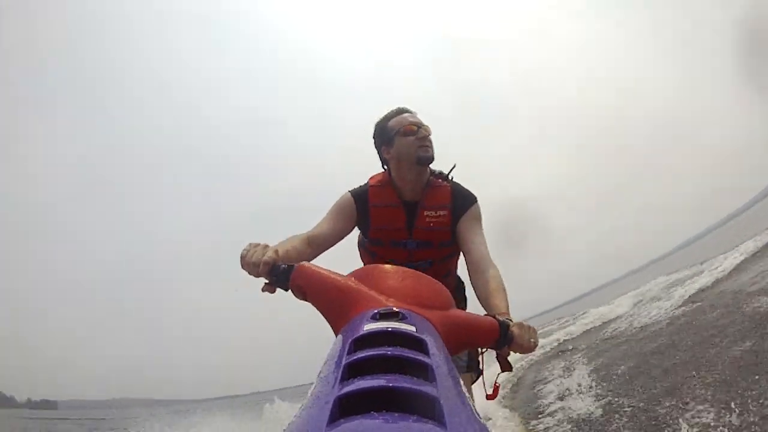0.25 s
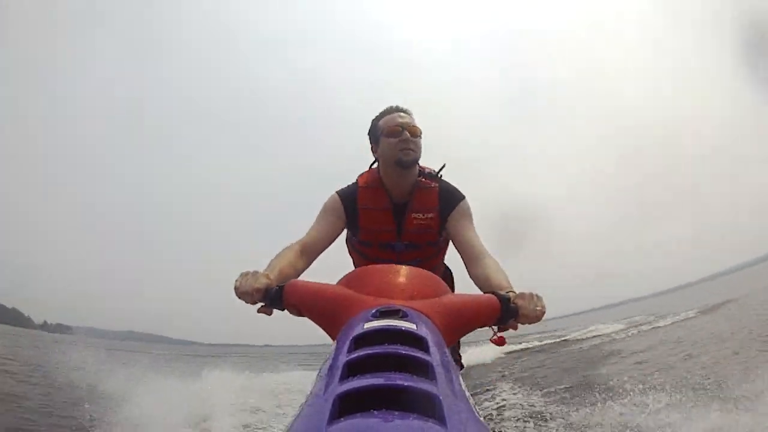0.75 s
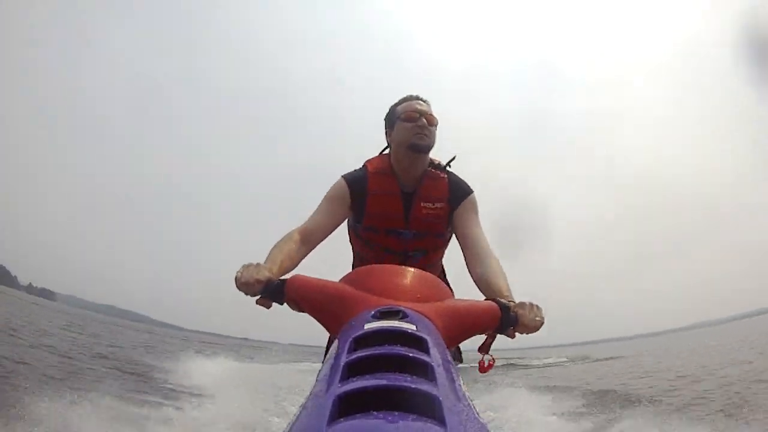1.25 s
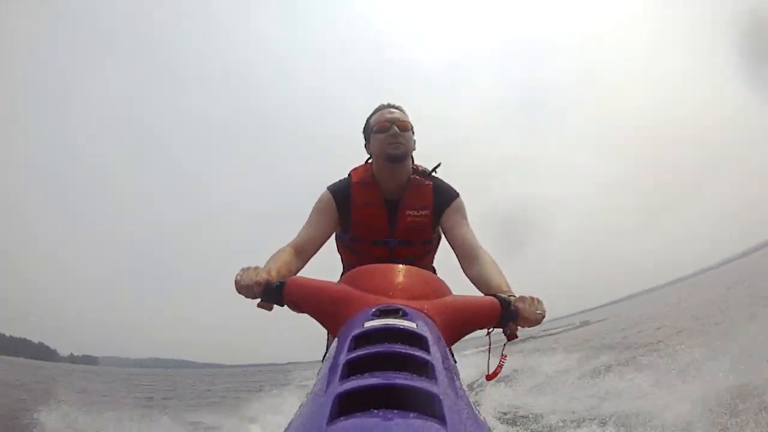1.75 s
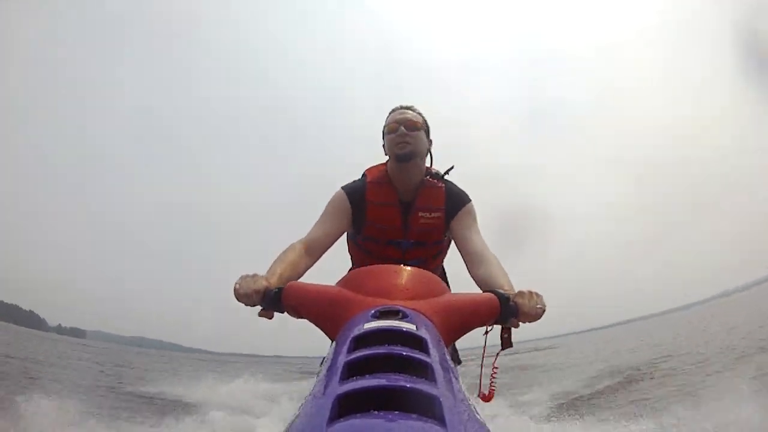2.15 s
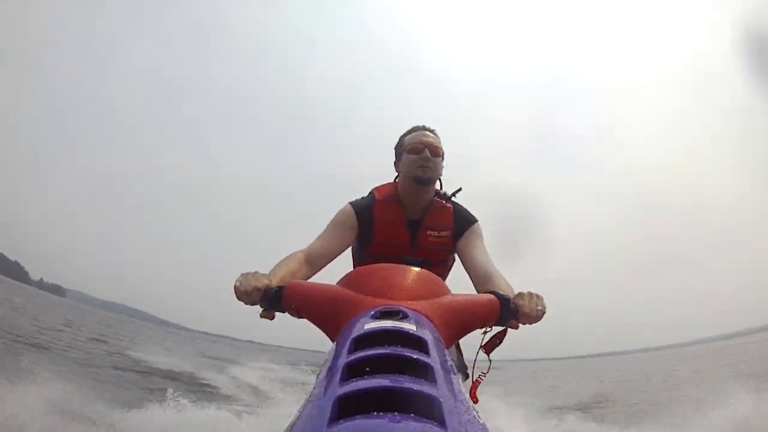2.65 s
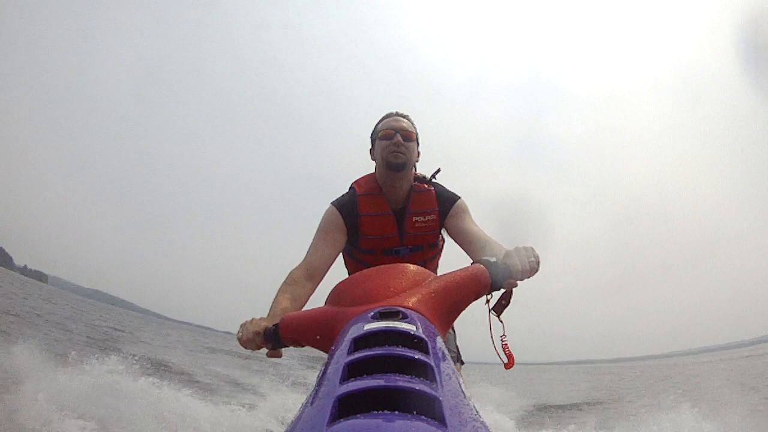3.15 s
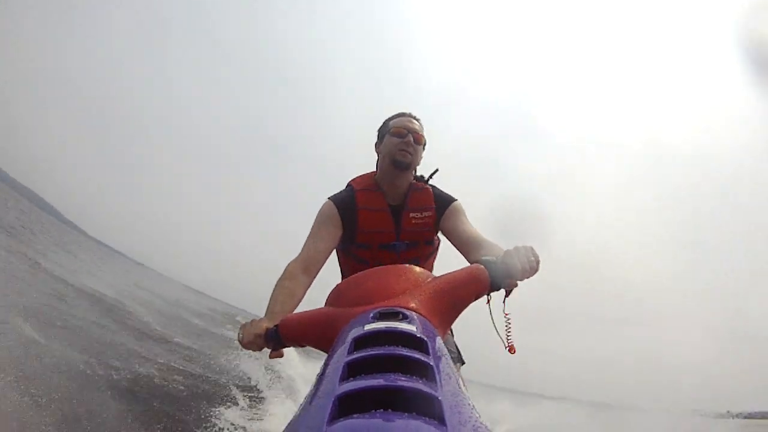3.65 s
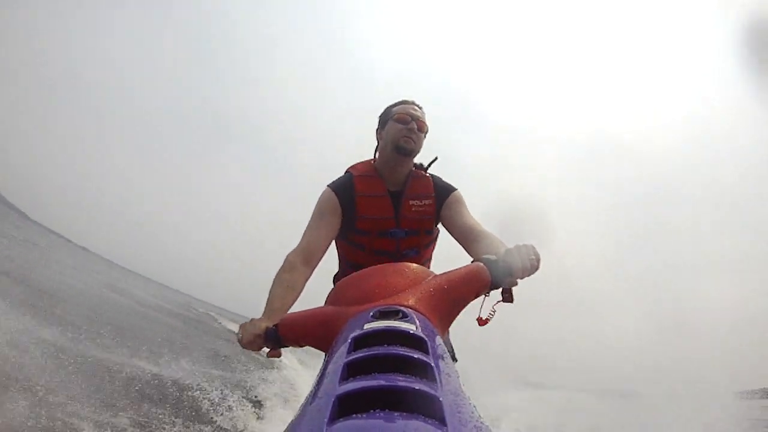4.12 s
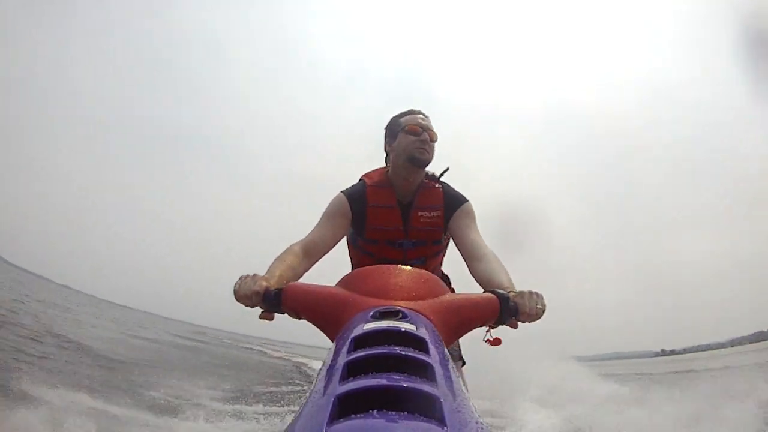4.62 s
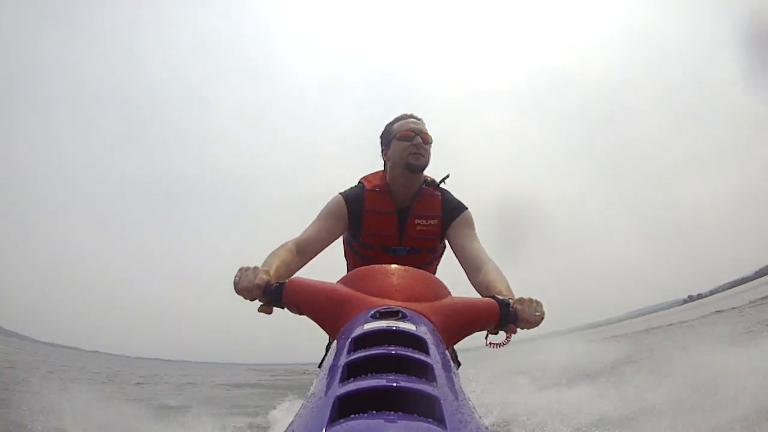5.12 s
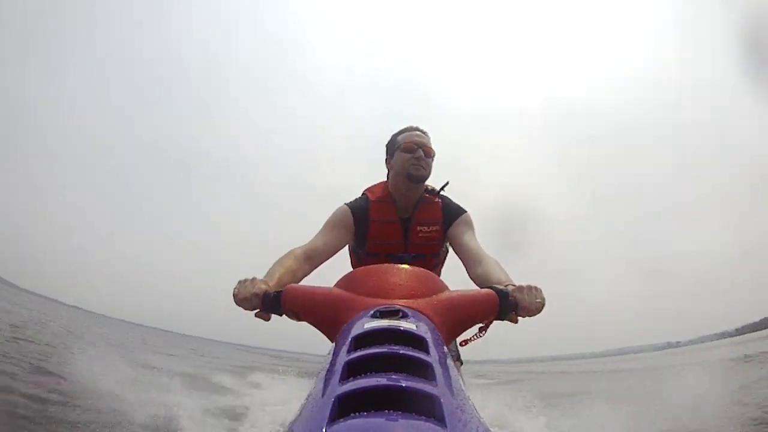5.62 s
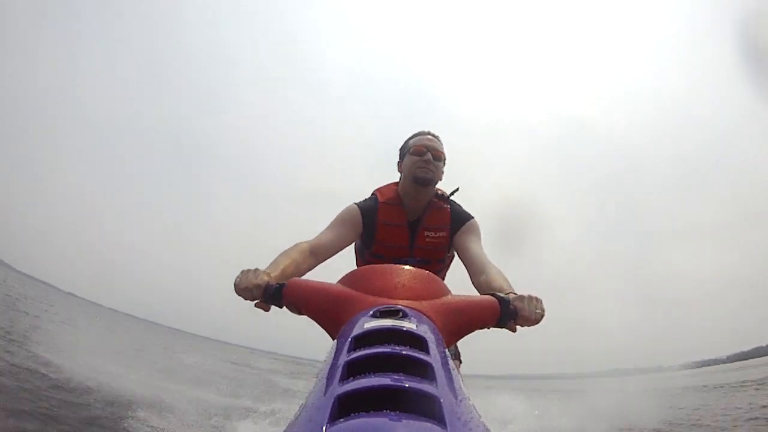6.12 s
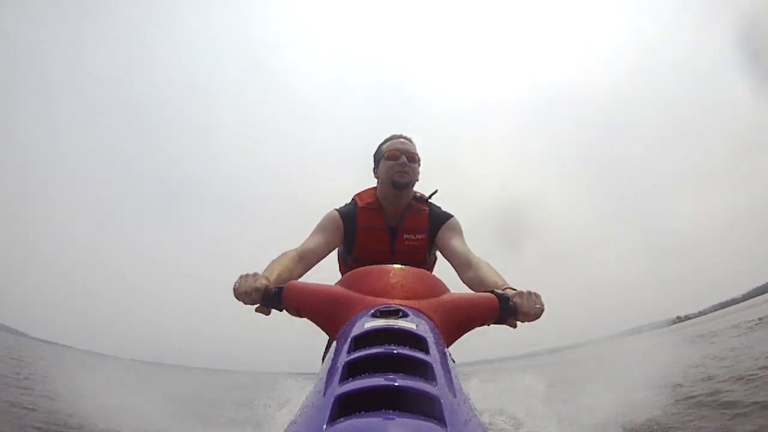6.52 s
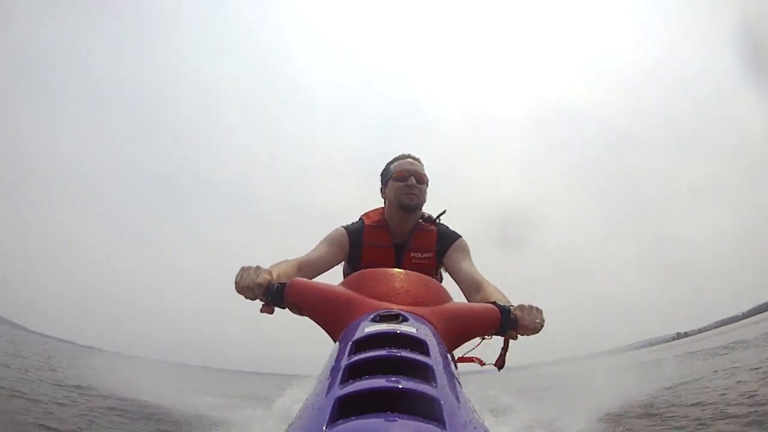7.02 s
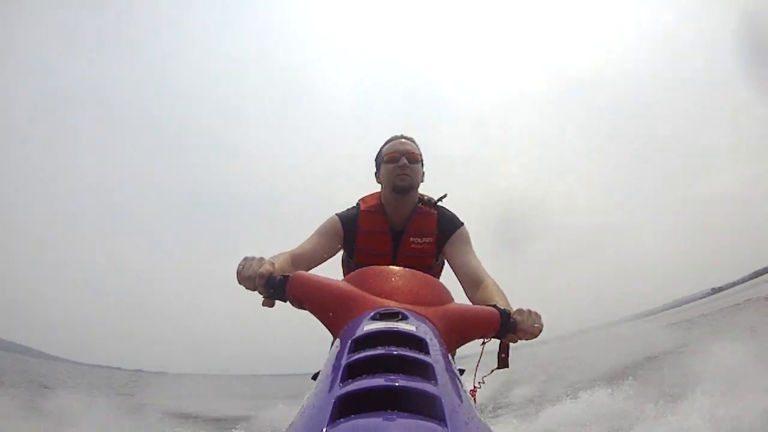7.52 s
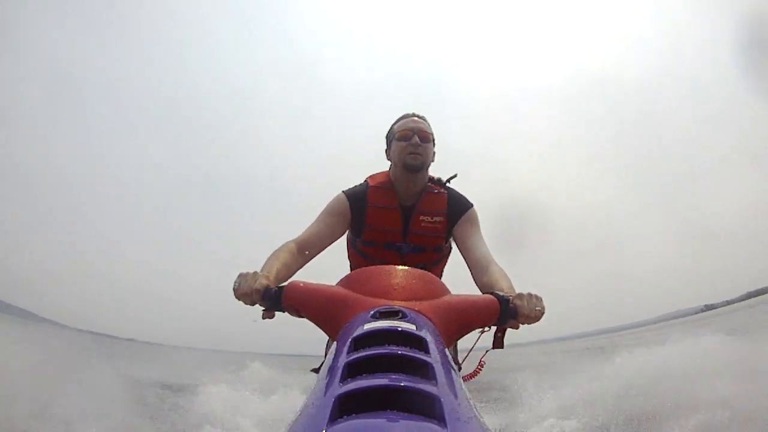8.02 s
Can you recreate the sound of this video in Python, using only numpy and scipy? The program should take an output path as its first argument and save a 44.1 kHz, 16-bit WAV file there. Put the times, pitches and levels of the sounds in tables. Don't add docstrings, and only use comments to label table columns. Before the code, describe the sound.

A two-stroke watercraft runs fast across open water, heard from a sealed microphone fixed to its hull. It opens with a loud raspy exhaust bark and heavy wave thuds, then a hard slap drops it into a duller, wavering hum. Wind roars and rumbles, spray washes and hisses, another sharp slap lands near the middle, and later droplets click on the case as the exhaust barks return.

```python
import sys
import numpy as np
from scipy import signal
from scipy.io import wavfile

SR = 44100
rng = np.random.default_rng(int(sys.argv[2]) if len(sys.argv) > 2 else 0)


def natural_amplitude(level_db):
    exponent = np.asarray(level_db, float) / 20
    return 10 ** exponent


def transcribe(u):
    v = np.clip(np.atleast_2d(u).T, -1, 1)
    q = np.round(v * 32767).astype(np.int16)
    wavfile.write(sys.argv[1], SR, q)


N = 364707
TIME = np.arange(N) / SR

# [t/s, head wind level/dB, side buffet level/dB, spray thrown/dB]
AIR = [(0.0, -43, -54.5, 4.5), (0.3, -47.5, -51, 8.5), (0.74, -44, -44.5, 3), (0.9, -45, -46.5, 2),
       (1.75, -47, -43, 0), (1.95, -39.5, -37, 0.5), (2.5, -43.5, -42, 0.5), (3.2, -43.5, -50, 2),
       (3.45, -39.5, -44.5, 5), (3.75, -42, -43.5, 3.5), (4.4, -40, -38, 7.5), (5.0, -38, -39.5, 5.5),
       (5.8, -38, -41, 6), (6.5, -38.5, -42.5, 6.5), (7.0, -41, -46, 3.5), (8.27, -38.5, -45, 4.5)]
# [middle t/s, length/s, thud lift/dB, splash lift/dB, hiss lift/dB]
WAVES = [(0.13, 0.22, 15.5, 3.5, 5.5), (0.33, 0.053, 7, 1.5, 2.5), (0.69, 0.22, 4.5, 4, 6),
         (1.09, .14, 8.5, 3, 1), (1.42, 0.35, -0.5, 3, 4), (1.92, 0.12, 1, 0.5, 1.5),
         (2.48, 0.2, -3.5, 1.5, 3), (2.75, 0.12, -5, 4, 3), (3.02, .22, 6.5, 0.5, 4), (3.37, .16, 9, 4, 2),
         (3.55, 0.11, 8, 6, 4), (3.93, 0.067, 5, 2.5, 5.5), (4.42, .2, 2.5, 1, 0.5),
         (4.86, 0.11, -0.5, 1.5, 2.5), (5.33, 0.18, -3, 2, 1), (5.79, 0.26, 1.5, 3, 2.5),
         (6.28, 0.24, 1, 4.5, 2), (6.63, .22, 4, 6, 4), (7.07, 0.15, 5, 9, 3.5), (7.4, .26, 8.5, 5.5, 4),
         (7.76, .18, 8, 5.5, 2.5), (7.89, 0.047, 12, 4.5, -3.5), (8.13, 0.27, 3.5, 5, 2.5)]


def evened(x):
    return x / np.sqrt(np.mean(x ** 2) + 1e-20)


def read(points, hz):
    f, value = np.transpose(points)
    return np.interp(np.log(hz + 1), np.log(f + 1), value)


def curves(rows):
    s, *columns = np.transpose(rows)
    return [np.interp(TIME, s, c) for c in columns]


def swells(rows):
    s, length, *strengths = np.transpose(rows)
    coarse = TIME[::64]
    from_middle = np.clip((coarse[:, None] - s) / length, -1, 1)
    humps = np.cos(np.pi / 2 * from_middle) ** 2
    return [np.interp(TIME, coarse, humps @ c) for c in strengths]


def wander(per_s):
    b, a = signal.butter(2, per_s, fs=SR / 64)
    coarse = signal.lfilter(b, a, rng.standard_normal(N // 64 + 2))
    return np.interp(np.arange(N) / 64, np.arange(len(coarse)), evened(coarse))


def coloured(x, points):
    log_gain = np.log(natural_amplitude(read(points, abs(np.fft.fftfreq(8192, 1 / SR)))))
    response = np.exp(np.conj(signal.hilbert(log_gain)))
    taps = np.fft.ifft(response).real[:4096] * np.hanning(8192)[4096:]
    return signal.oaconvolve(x, taps)[:len(x)]


def per_band(x, band):
    inside = signal.sosfilt(signal.butter(4, band, "band", fs=SR, output="sos"), x)
    return x / np.sqrt(np.mean(inside ** 2))


def add(mix, s, sound):
    part = mix[round(s * SR):][:len(sound)]
    part += sound[:len(part)]


def ring(hz, t60, rise=1.0):
    t = TIME[:4000]
    soft_start = 1 - np.exp(-(t * hz * rise) ** 2)
    wave = np.sin(2 * np.pi * hz * t) * natural_amplitude(-60 * t / t60) * soft_start
    return wave / abs(wave).max()


def engine(jitter=0.0034, unsteady_db=1.0, pulse_lag=0.3, fading_db=2.5, bark_share=0.82):
    # [t/s, shaft f/Hz, pump load level/dB, mount shake level/dB]
    drive = [(0.0, 86.4, -32.5, -44), (0.64, 89.27, -33.5, -48), (0.78, 93.64, -34.5, -43),
             (1.0, 96.7, -32.5, -41), (1.38, 97.0, -31.5, -41), (1.5, 95.6, -31.5, -39),
             (2.2, 95.3, -33.5, -44.5), (2.86, 87.8, -37, -41.5), (3.33, 94.2, -36.5, -43),
             (3.85, 85.9, -34.5, -54), (4.22, 92.2, -39.5, -48.5), (5.0, 89.2, -35, -51.5),
             (5.75, 100.6, -34, -47.5), (6.2, 98.4, -32, -53), (6.65, 99.7, -31.5, -40),
             (7.22, 92.7, -39, -47), (7.55, 87.8, -35.5, -51.5), (8.27, 88.0, -42.5, -42.5)]
    # [shaft order, level/dB]
    exhaust = [(5, 1.5), (6, -6.5), (7, -14.5), (8, -11), (9, -20.5), (10, -30.5), (11, -23), (12, -35),
               (13, -29), (14, -35), (15, -28.5), (16, -28.5)]
    # [middle t/s, length/s, drop/dB]
    gulps = [(0.33, 0.34, -9.5), (0.83, 0.074, -8), (2.42, 0.11, -6.5), (2.9, 0.28, -25), (3.78, .3, -25.5),
             (4.5, .15, -3.5), (4.85, 0.38, -10.5), (5.26, .14, -13), (5.87, 0.21, -29), (6.47, 0.21, -8),
             (6.8, 0.26, -6), (7.42, .3, -23), (7.85, .2, -8)]
    # [middle t/s, length/s, lift/dB]
    barks = [
        (0.06, 0.19, 7),
        (0.3, 0.14, 3.5),
        (0.68, 0.29, 6.5),
        (3.01, 0.16, 7),
        (4.1, .18, 9),
        (5.11, 0.086, 15.5),
        (6.6, 0.12, 12.5),
        (7.55, 0.56, 8.5),
        (8.03, .3, 10.5),
    ]
    # [middle t/s, length/s, lift/dB]
    booms = [(0.1, 0.34, 9), (0.93, 0.099, 8), (1.35, 0.25, 3), (2.26, .14, 5), (2.58, 0.13, 10.5),
             (3.01, 0.061, 15), (3.33, 0.13, 6), (4.0, 0.22, 18), (4.15, 0.13, 10), (4.33, 0.16, 22.5),
             (4.66, .14, 1), (5.41, 0.26, 17.5), (5.68, 0.16, 14.5), (6.12, 0.3, 7), (6.55, 0.25, 7.5),
             (7.22, 0.13, 5), (7.42, .12, 3), (7.72, 0.26, 7.5)]
    hz, load_db, shake_db = curves(drive)
    gulp_db, bark_db, boom_db = swells(gulps)[0], swells(barks)[0], swells(booms)[0]
    landing_s, carving_db = 0.815, 13.5
    bark_db = bark_db + carving_db * np.clip((landing_s - TIME) / 0.013, 0, 1)
    drowned_db = -58
    low_orders_db = [
        shake_db - 0.5 + fading_db * wander(2.3),
        shake_db - 4.5 + boom_db + fading_db * wander(5.2),
        load_db + gulp_db,
        shake_db - 7.5 + bark_share * bark_db + fading_db * wander(5.9)]

    chop = np.interp(TIME, [3.4, 3.65, 4.9, 5.3], [1, 5.5, 5.5, 3])
    angle = 2 * np.pi * np.cumsum(hz * (1 + jitter * chop * wander(25))) / SR
    out = np.zeros(N)
    for k, level_db in enumerate(low_orders_db, 1):
        level = natural_amplitude(level_db + unsteady_db * np.sqrt(chop) * wander(20))
        out += level * np.cos(k * angle + pulse_lag * k ** 2)
    for k, db in exhaust:
        level = natural_amplitude(drowned_db + bark_db + db + 3.0 * wander(7.8))
        out += level * np.cos(round(k) * angle + pulse_lag * k ** 2)
    return np.sqrt(2) * out, angle


def wind(gust_db=2.5, lump_db=1.5, splash_share=0.69, deep_db=-44, deep_share=0.34):
    # [f/Hz, density/dB]
    roar_shape = [(60, -31.5), (150, -11), (250, -4.5), (340, 0.5), (450, -4), (620, -10), (900, -22),
                  (1400, -34), (2200, -49), (4000, -78.5), (8000, -110)]
    rumble_shape = [(20, -28.5), (45, -17.5), (65, -15.5), (95, -3.5), (140, -3), (200, -3), (280, -2.5),
                    (400, -25), (700, -56.5), (1500, -90.5), (4000, -120)]
    head_db, side_db, _ = curves(AIR)
    thud_db, splash_db, _ = swells(WAVES)
    roar = coloured(natural_amplitude(lump_db * wander(20)) * rng.standard_normal(N), roar_shape)
    rumble = coloured(natural_amplitude(gust_db * wander(6.7)) * rng.standard_normal(N), rumble_shape)
    roar, rumble = per_band(roar, (480, 900)), per_band(rumble, (110, 170))
    deep = signal.sosfiltfilt(signal.butter(2, 95, fs=SR, output="sos"), rumble)
    buffet_db = side_db + thud_db
    return (natural_amplitude(head_db + splash_share * splash_db - 1.7) * roar
            + natural_amplitude(buffet_db) * (rumble - deep)
            + natural_amplitude(deep_db + deep_share * (buffet_db + 44.5)) * deep)


def spray(angle, per_s=450, spread_db=4.5, throb=0.25):
    # [f/Hz, density/dB]
    case = [(300, -14), (1000, -5), (1500, -2.5), (2000, -6), (2550, -2), (2800, -8.5), (3100, -15.5),
            (3900, -36.5), (6000, -36.5), (8000, -54), (15000, -61)]
    clumps = per_s * natural_amplitude(7.5 * wander(25))
    size = natural_amplitude(spread_db * np.minimum(rng.exponential(1, N), 4))
    taps = evened(size * (rng.random(N) < clumps / SR))
    fine = rng.standard_normal(N) * (1 + throb * np.cos(2 * angle)) * natural_amplitude(0.8 * wander(28))
    mixed = coloured(fine + 0.9 * (taps - taps.mean()), case)
    wash_db = -66.5 + 0.64 * curves(AIR)[2] + swells(WAVES)[1]
    return natural_amplitude(wash_db) * per_band(mixed, (1500, 3200))


def hiss(angle, low_throb=0.27, high_throb=0.82, uneven=0.73):
    # [f/Hz, density/dB]
    body_shape = [(2800, -5.5), (3800, -7), (4200, -5), (4700, -1.5), (5100, -3.5), (5500, -8),
                  (6000, -6.5), (6700, -12.5), (7300, -22.5), (9000, -29.5), (16000, -43)]
    whistle_shape = [(5000, -42.5), (7500, -13), (9500, -10), (10200, -6), (10800, 1), (11400, -10),
                     (12200, -10), (14000, -11), (15200, -13.5), (16500, -31.5)]
    thrown_db, wave_db = curves(AIR)[2], swells(WAVES)[2]
    racing = np.interp(TIME, [0.3, 1.3], [1, 0])
    low_db = -77.5 + 1.08 * thrown_db + 0.8 * wave_db
    high_db = -92.5 + 0.15 * thrown_db + 1.4 * wave_db + 7.0 * racing
    firing = (np.cos(2 * angle) + uneven * np.cos(angle + 1)) / (1 + uneven)
    flutter = natural_amplitude(1.3 * wander(22))
    low_puffs = flutter * np.exp(low_throb * firing) * rng.standard_normal(N)
    high_puffs = flutter ** 1.3 * np.exp(high_throb * firing) * rng.standard_normal(N)
    low = per_band(coloured(low_puffs, body_shape), (4000, 7000))
    high = per_band(coloured(high_puffs, whistle_shape), (9800, 12000))
    return natural_amplitude(low_db - 0.34) * low + natural_amplitude(high_db + 1.0) * high


def knocks(splatter=0.2, splatter_t60=0.04):
    # [t/s, peak level/dB, low knock above it/dB]
    drops = [(0.8182, -48, 11), (1.9445, -41, 0), (2.0206, -38, -5), (2.7358, -40.5, 1), (2.9977, -40, -14),
             (3.1075, -41, -7), (3.333, -45.5, 17), (3.3648, -41, -8), (3.447, -43, -5), (3.5017, -35, 3),
             (4.1093, -41.5, -4), (4.3253, -46, -9), (5.9133, -42, -3), (6.2505, -39.5, 14),
             (6.5244, -40, -8), (6.5778, -45.5, 7), (6.6865, -41.5, -3), (6.8726, -38.5, -7),
             (6.9366, -43.5, 10), (6.959, -40, 3), (6.995, -33, 8), (7.1891, -38, -9), (7.3037, -33, -3),
             (7.3827, -40.5, 13), (7.437, -39, -3), (7.6852, -43.5, 11.5), (7.7654, -40, 12.5),
             (8.0137, -44, 14), (8.1836, -38, -12), (8.2, -33, 4)]
    # [f/Hz, density/dB]
    drop_shape = [(300, -15), (1000, -1.5), (1500, -2), (2100, -3.5), (2600, -0.5), (2900, -8), (3300, -19),
                  (4000, -33), (6000, -40), (9000, -58)]
    # [t/s, peak level/dB, lower ring above it/dB]
    ticks = [
        (0.3684, -61.5, 5),
        (1.074, -68.5, 5),
        (1.1393, -64, 0.5),
        (1.6158, -71, 6),
        (3.5454, -72, 1.5),
        (4.9973, -67, 9),
        (5.4555, -76, 15),
        (7.7652, -61, -0.5),
        (7.9394, -70, 7),
    ]
    # [t/s, peak level/dB, ring f/Hz, t60/s]
    slaps = [
        (0.8162, -15.5, 284, 0.09),
        (1.087, -26, 151, 0.052),
        (3.4732, -18.5, 300, 0.04),
        (7.96, -27, 272, .04),
    ]
    out, t = np.zeros(N), TIME[:2000]
    impulse = 1.0 * (t == 0)
    peak = coloured(impulse, drop_shape).max()
    for s, db, low_db in drops:
        chance = rng.standard_normal(len(t))
        fragments = chance * (abs(chance) > 2.3)
        burst = impulse + splatter * fragments * natural_amplitude(-60 * t / splatter_t60)
        click = coloured(burst, drop_shape) / peak
        knock = natural_amplitude(low_db - 11.0) * ring(1250, 0.005)[:len(t)]
        add(out, s + 0.0006, natural_amplitude(db + 1.1) * (click + knock))
    for s, db, low_db in ticks:
        lower = natural_amplitude(low_db + 3.5) * ring(6000, 0.0062, rise=0.66)
        add(out, s, natural_amplitude(db) * (ring(13000, 0.0048, rise=0.6) + lower))
    for s, db, hz, t60 in slaps:
        blow = ring(1.1 * hz, 0.014, rise=3) + 0.3 * ring(2.1 * hz, 0.006, rise=2)
        edge = 0.026 * ring(3100, 0.005, rise=0.5)
        hull = 0.22 * ring(hz, t60) + 0.18 * ring(0.34 * hz, t60)
        add(out, s, natural_amplitude(db) * (blow + edge + hull))
    return out


def scene():
    orders, angle = engine()
    return (orders + wind() + spray(angle) + hiss(angle) + knocks())[None]


def top_cut(x):
    return signal.sosfilt(signal.butter(12, 15200, fs=SR, output="sos"), x)


def record(dry):
    ceiling = natural_amplitude(-15.5)
    rounded = ceiling * np.tanh(dry / ceiling)
    ending = np.clip(0.5 + (TIME[-1] - TIME) / 0.006, 0, 1)
    return top_cut(rounded * ending)


dry = scene()
out = record(dry)
transcribe(out)
```